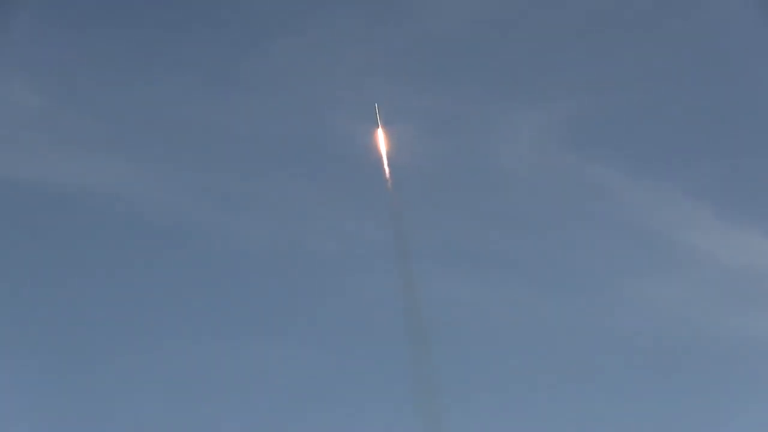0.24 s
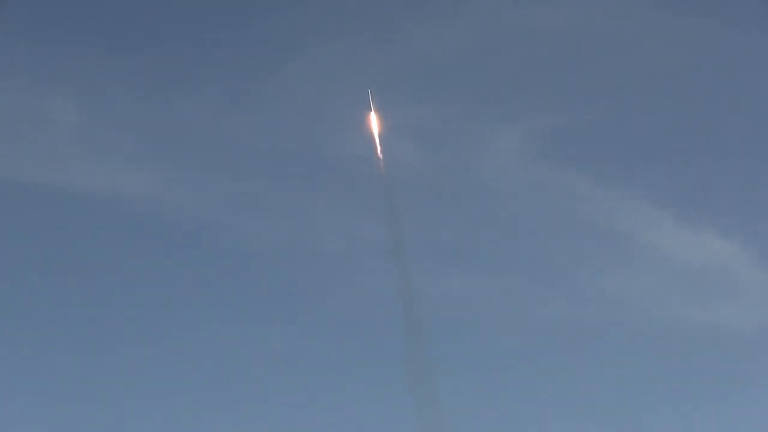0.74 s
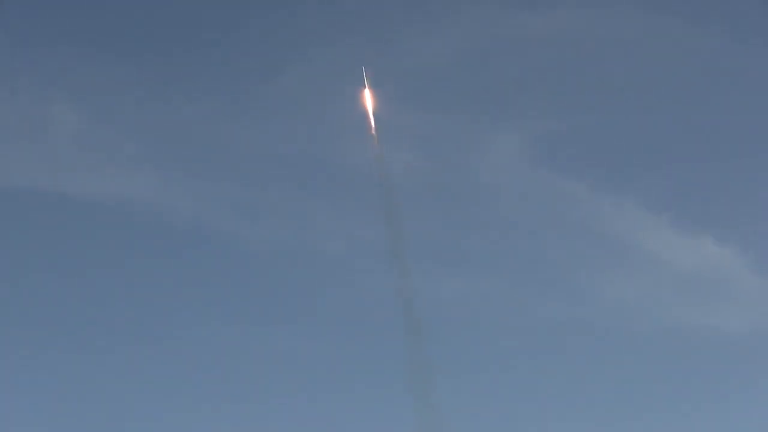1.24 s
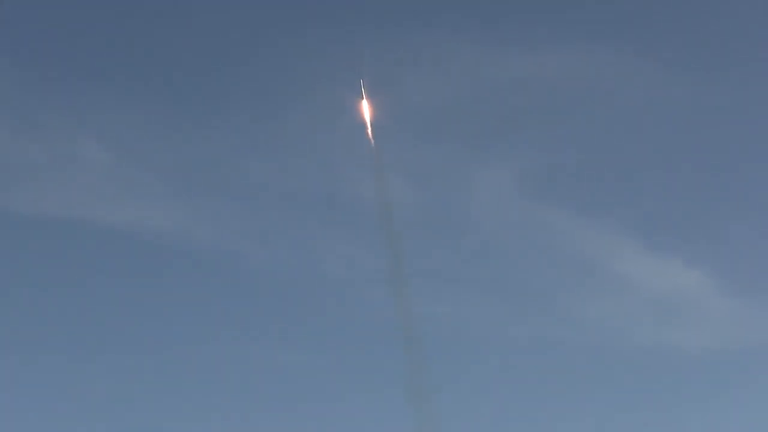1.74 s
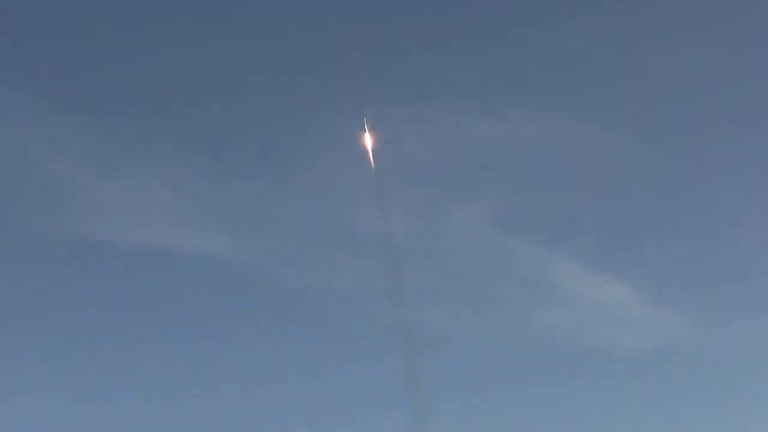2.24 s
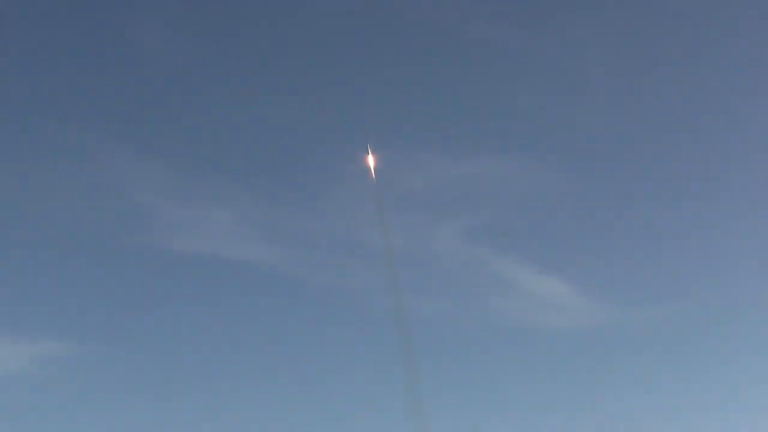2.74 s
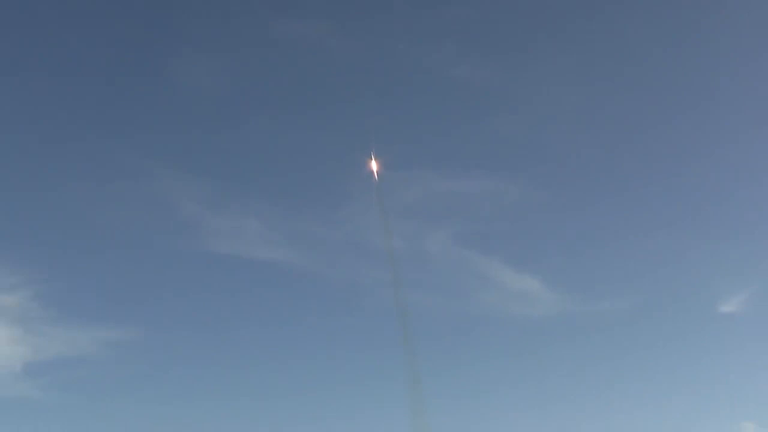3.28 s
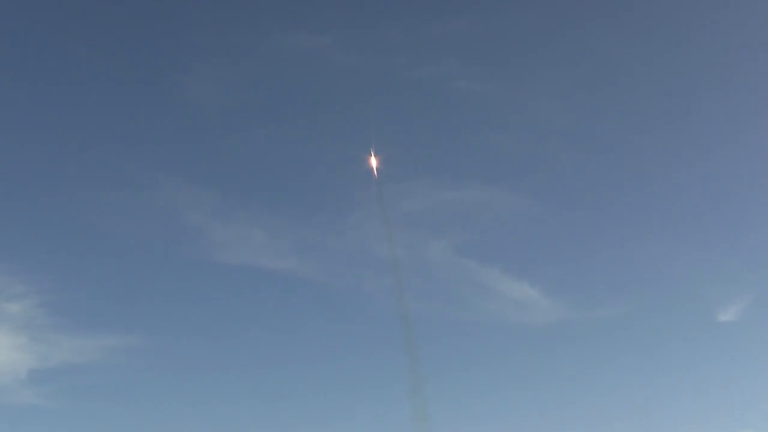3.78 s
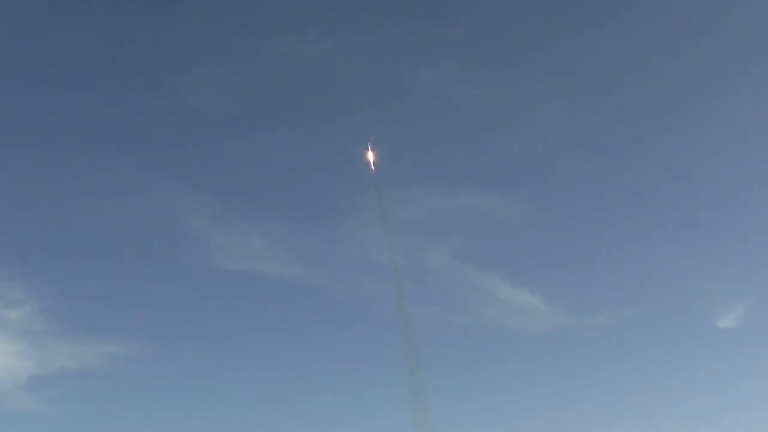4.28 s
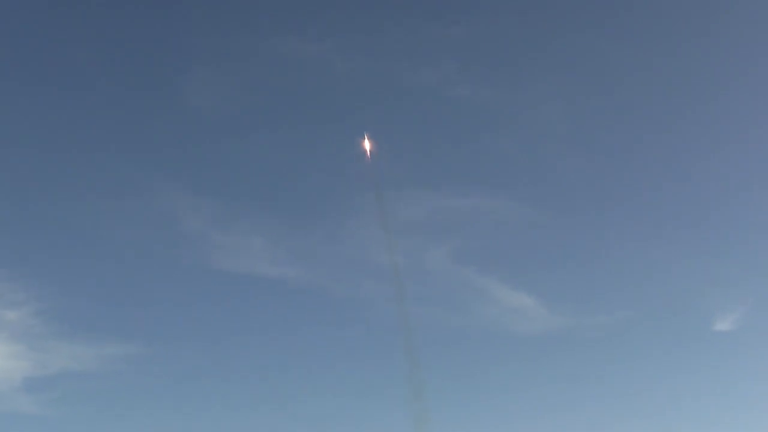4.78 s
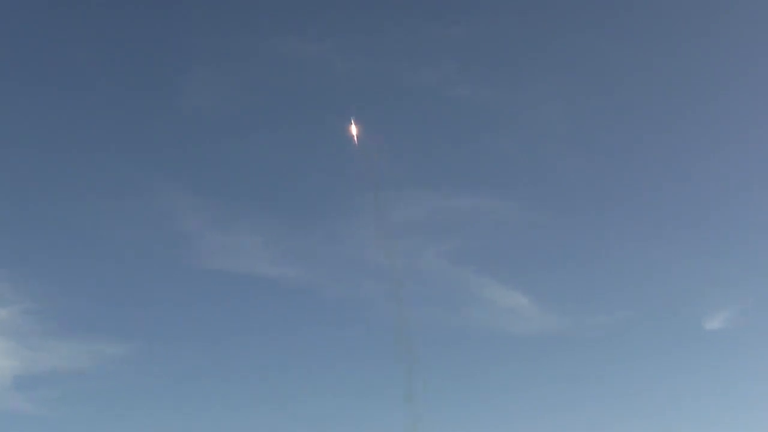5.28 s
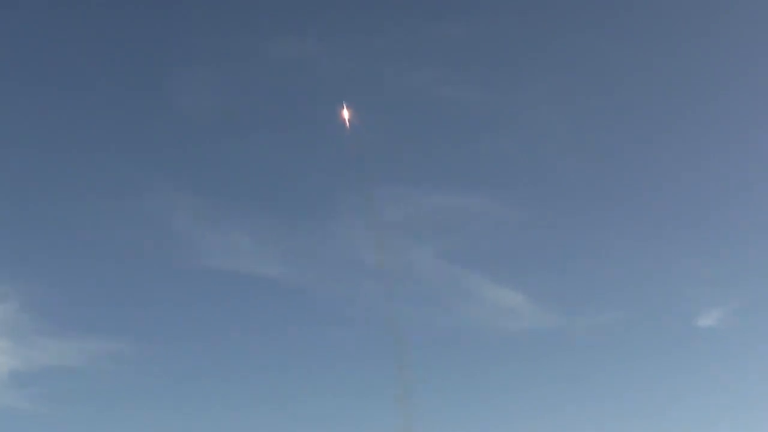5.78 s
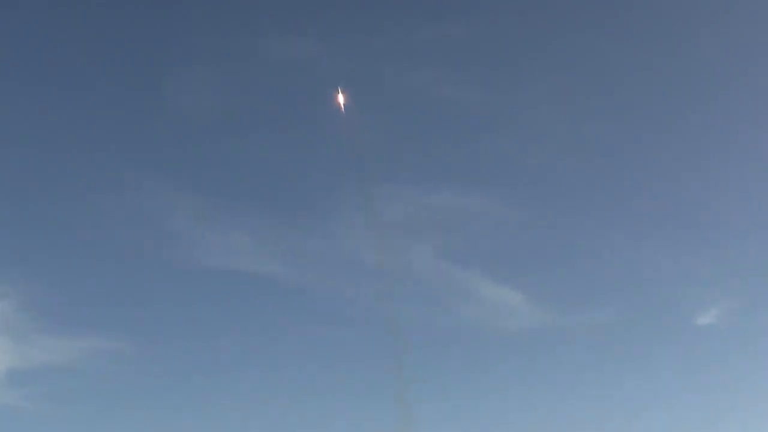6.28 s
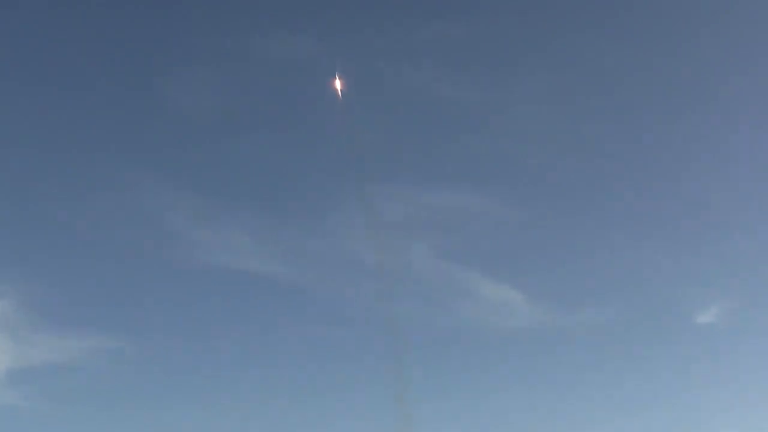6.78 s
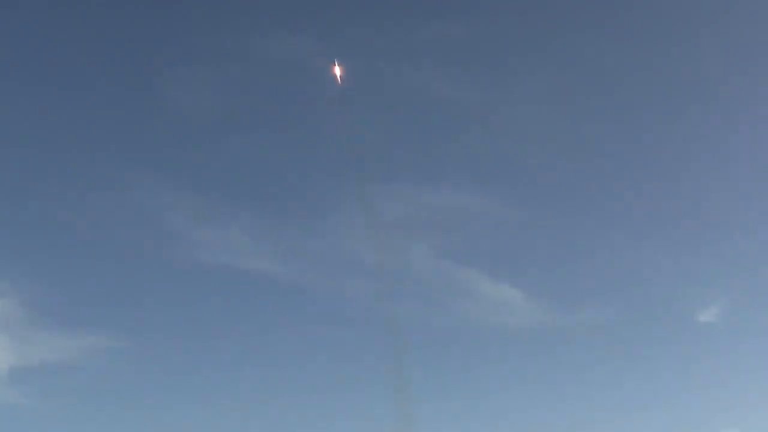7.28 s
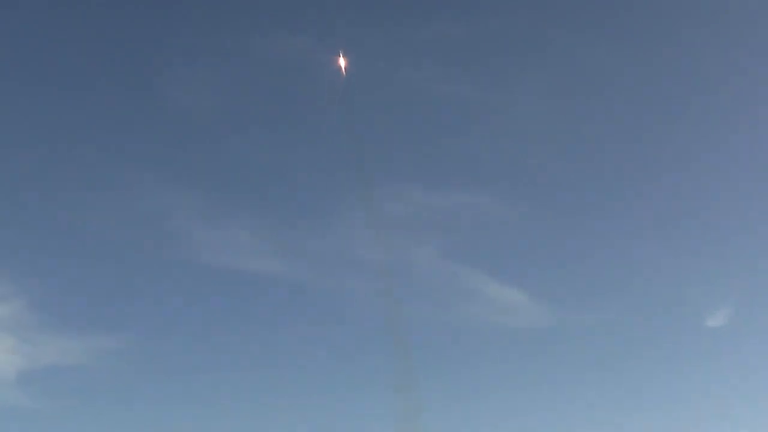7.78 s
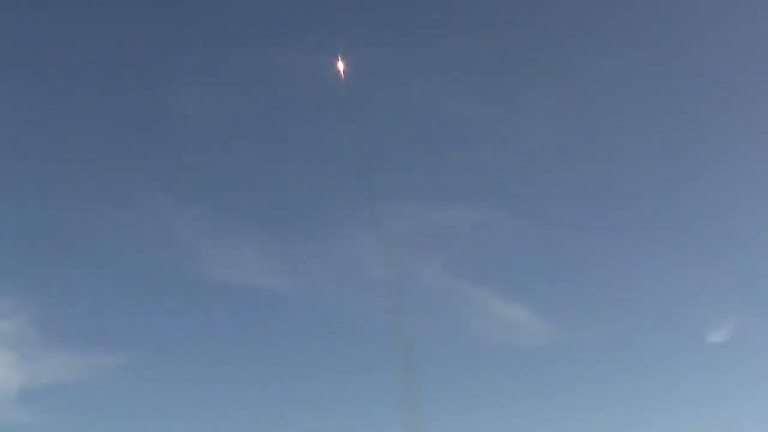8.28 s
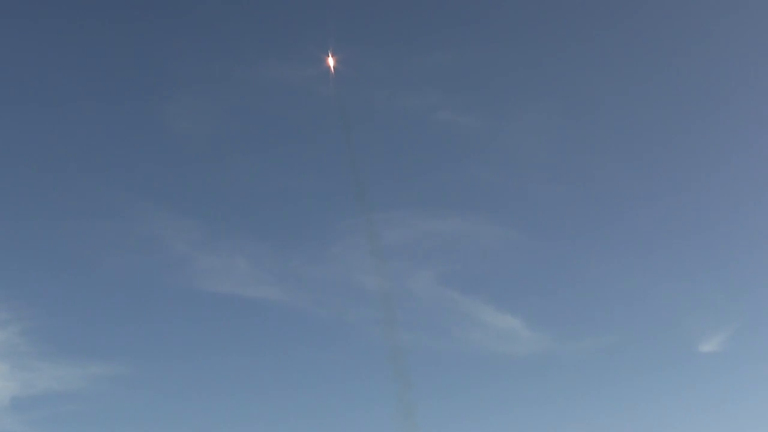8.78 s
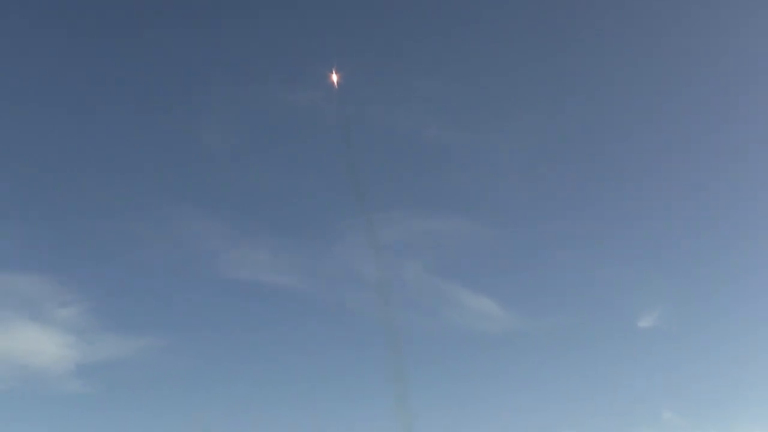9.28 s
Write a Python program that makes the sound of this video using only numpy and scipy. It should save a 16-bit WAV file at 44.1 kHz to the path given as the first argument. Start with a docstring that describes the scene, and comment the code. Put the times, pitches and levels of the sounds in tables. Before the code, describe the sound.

Sharp, irregular cracks and pops run over the low rumble of a distant ascending rocket, the roar easing as the crackle turns crisper.

```python
"""A deep roar, shot through with sharp crackle, comes from a rocket climbing far overhead.
Turbulent eddies in the exhaust rumble and rush; its steep shock fronts crackle and the tiniest sizzle,
rounded off more or less by the air from moment to moment. Each crack reaches the microphone directly,
then by reflection off nearby surfaces milliseconds later; the first bounce lags more as the rocket climbs."""
import sys
import numpy as np
from scipy.fft import rfft, irfft, next_fast_len
from scipy.io import wavfile
from scipy.ndimage import map_coordinates

SR = 44100
rng = np.random.default_rng(int(sys.argv[2]) if len(sys.argv) > 2 else 0)


def pcm_store(signal):
    """Save signal as 16-bit PCM."""
    levels = np.round(np.clip(np.atleast_2d(signal), -1, 1) * 32767)
    wavfile.write(sys.argv[1], SR, levels.astype(np.int16).T)


N = 420273
TIME = np.arange(N) / SR

# The strength of the exhaust noise. Each row: time in seconds, roar level in dB, sizzle level in dB.
EXHAUST = [(0, -23, -94), (.35, -21, -83), (.62, -19.5, -88), (.75, -23.5, -93.5), (.95, -18.5, -99),
           (1.27, -25.5, -84.5), (1.6, -19.5, -93), (2.1, -25.5, -82), (2.76, -30, -82.5),
           (3.3, -40.5, -82), (3.63, -31, -83), (3.9, -39.5, -74), (4.2, -34, -79), (4.75, -34.5, -70),
           (4.92, -32, -73), (5.3, -32.5, -74), (5.8, -30.5, -75.5), (6.1, -25.5, -82), (6.25, -28, -64),
           (6.34, -27.5, -75), (6.5, -26.5, -73), (6.95, -27, -64.5), (7.15, -37, -66), (7.4, -33, -65),
           (7.47, -30, -53.5), (7.6, -33, -57), (7.74, -27.5, -56), (7.79, -25.5, -71), (7.86, -27, -72),
           (7.93, -32, -55), (8.05, -30, -52.5), (8.19, -33, -49), (8.23, -34.5, -66), (8.28, -33.5, -53.5),
           (8.5, -37, -56.5), (8.66, -35, -72), (8.86, -34, -75.5), (9.2, -27, -76), (9.53, -27, -68)]
# The sound path during the climb. Each row: time in seconds, lag of the first bounce in ms, frequency of
# a front's swing in Hz, its quality factor, gain of the bounce in dB, extra direct-path rounding in ms.
PATH = [(0, 1.48, 335, 2.6, -14, .1), (1.7, 1.343, 352, 2, -17.5, 0.19),
        (2.8, 1.36, 327, 1.04, -14.5, 0.041), (3.8, 1.452, 336, 0.81, -22, 0.088),
        (4.7, 1.505, 343, 0.97, -23, 0.29), (5.7, 1.695, 305, 0.94, -21, 0.22),
        (6.8, 1.857, 268, 1.25, -16, 0.027), (7.7, 1.95, 302, 0.73, -25, 0.051),
        (8.4, 2.07, 374, 0.84, -20, 0.036), (9.53, 2.1, 364, 0.73, -30, 0.073)]


def amp(db):
    """Amplitude ratio of a level in decibels."""
    return 10 ** (np.asarray(db) / 20)


def unit(x):
    """Normalisation to an rms of 1."""
    return x / np.sqrt(np.mean(x ** 2) + 1e-20)


def columns(rows, seconds):
    """Linear interpolation of each column after the time."""
    times, *values = np.transpose(rows)
    return [np.interp(seconds, times, column) for column in values]


def wobble(rate):
    """Smooth random modulation: a spline through rate knots a second."""
    return map_coordinates(rng.standard_normal(int(N * rate / SR) + 4), [TIME * rate])


def filtered(x, response):
    """Linear filtering: the spectrum of x times a response of frequency."""
    padded = next_fast_len(N + 8192)
    return irfft(rfft(x, padded) * response(np.fft.rfftfreq(padded, 1 / SR)), padded)[..., :N]


def noise(spectrum, density=1):
    """Random excitation shaped by (Hz, dB) points, at rms 1; a low density leaves separate grains."""
    points_hz, db = np.transpose(spectrum)
    grains = rng.standard_normal(N) * (rng.random(N) < density)
    return unit(filtered(grains, lambda hz: amp(np.interp(np.log(hz + 1), np.log(points_hz + 1), db))))


def follow_roar(seconds, base_db, db_per_db, db_per_s):
    """Common source: a level in dB that follows the roar's excess over -27 dB and drifts with distance."""
    roar_db, _ = columns(EXHAUST, seconds)
    return base_db + db_per_db * (roar_db + 27) + db_per_s * seconds


def bounced(x, bounce_db):
    """Comb filtering: the direct sound interferes with its first reflection."""
    lag_ms = columns(PATH, TIME)[0]
    return x + amp(bounce_db) * np.interp(TIME - lag_ms / 1000, TIME, x)


def roar():
    """Turbulent mixing noise: the largest eddies radiate the lowest frequencies."""
    # Spectra of the roar and the rumble under it. Each row: frequency in Hz, relative density in dB.
    roar_spectrum = [(45, -32.5), (78, 2.5), (110, 0), (160, -3.5), (205, -10.5), (260, -10), (340, -37),
                     (570, -120)]
    rumble_spectrum = [(10, -33), (20, -1), (45, 6), (75, 2.5), (120, -35.5), (200, -120)]
    roar_db, _ = columns(EXHAUST, TIME)
    rumble_db = follow_roar(TIME, base_db=-33, db_per_db=0.6, db_per_s=0.6) + 0.62 * wobble(4.7)
    surging = unit(amp(1.2 * wobble(11)) * noise(roar_spectrum))
    return amp(roar_db) * surging + amp(rumble_db) * noise(rumble_spectrum)


def rush():
    """Smaller eddies radiate higher frequencies, in lumps over an even flow."""
    # The spectrum of the smaller eddies. Each row: frequency in Hz, relative density in dB.
    spectrum = [(88, -25.5), (150, 7), (210, -1.5), (270, 1), (330, 5.5), (450, -3), (680, -8.5),
                (953, -13), (1140, -19.5), (1340, -20), (2600, -35.5), (3370, -74.5), (4380, -76),
                (7410, -120)]
    lumps = amp(1.5 * wobble(8.3) + 1.8 * wobble(60)) * noise(spectrum, density=0.008)
    even = amp(-3.5 + 1.2 * wobble(20)) * noise(spectrum)
    level_db = follow_roar(TIME, base_db=-30.5, db_per_db=0.44, db_per_s=-0.15)
    return amp(level_db) * unit(bounced(lumps + even, bounce_db=-10))


def sizzle():
    """Shot noise: the tiniest shock fronts arrive at random and merge into spurts of treble."""
    # The spectrum of the tiniest fronts. Each row: frequency in Hz, relative density in dB.
    spectrum = [(1000, -120), (1500, 5), (2600, 8.5), (4000, 1.5), (5500, -2), (7500, -10.5), (9500, -16.5),
                (13000, -45), (16000, -120)]
    _, level_db = columns(EXHAUST, TIME)
    spurts = amp(3.5 * wobble(14) + 4 * wobble(90))
    return amp(level_db) * unit(bounced(spurts * noise(spectrum, density=0.016), bounce_db=-5.5))


def air_rounding(hz, rise_ms):
    """Air absorption: a Gaussian low-pass that spreads a sudden step over its rise time."""
    width = np.pi ** 2 * hz * np.clip(rise_ms, 0.01, 2) / 2000 + 1e-9
    return np.exp(-width ** 2 / 8)


def resonance(hz, centre_hz, q):
    """Frequency response of a damped oscillator."""
    return 1 / (centre_hz ** 2 - hz ** 2 + 1j * hz * centre_hz / q)


def shock_fronts(seconds, jump_db, rise_ms):
    """Multipath propagation: each pressure jump swings back below zero and is followed by its echoes."""
    span, lead = 2048, 128  # samples for each front, and of those ahead of its jump
    hz, t = np.fft.rfftfreq(span, 1 / SR), np.arange(span) / SR
    count = len(seconds)
    jump_db, rise_ms = jump_db[:, None], rise_ms[:, None]
    lag_ms, swing_hz, q, bounce_db, rounding_ms = columns(PATH, seconds[:, None])
    delay = lambda ms: np.exp(-2j * np.pi * hz * ms / 1000)
    lowpass = lambda corner_hz: 1 / (1 + 1j * hz / corner_hz)
    spread = lambda db: db * rng.standard_normal((count, 1))
    scatter = lambda envelope: rfft(rng.standard_normal((count, span)) * envelope)

    swing = 1j * hz * resonance(hz, swing_hz, q)
    tooth = amp(-18 + 3.2 * (jump_db + 8.5)) * air_rounding(hz, 0.68 * rise_ms)
    edge = air_rounding(hz, rise_ms) + tooth  # strong fronts keep a steep tooth
    direct = edge * swing * air_rounding(hz, rounding_ms)
    direct_peak = irfft(direct).max(1, keepdims=True)
    suction = -amp(-16.5) * 102 * resonance(hz, centre_hz=95.5, q=1.2)

    tick = amp(11) / (1200 + 1j * hz)  # brightens the first bounce
    first = amp(bounce_db + spread(db=1)) * delay(lag_ms) * (swing + tick) * lowpass(12000)
    # As the first lag grows, the second bounce weakens, and both it and a soft thump come later.
    extra_ms = lag_ms - 1.23
    second = amp(-2.5 - 5 * extra_ms) * delay(2.56 + 0.53 * extra_ms) * swing * lowpass(190)
    thump_shape = 130 * resonance(hz, centre_hz=129, q=0.98) * lowpass(550)
    thump = amp(-8.5) * delay(3.61 + 2.6 * extra_ms) * thump_shape
    far_echo = amp(-23.5 + spread(db=3)) * delay(8.5) * swing * (1 - lowpass(1500))

    # Ground and bushes scatter a short burst and a faint wash behind each front.
    burst = scatter(amp(-27 - 60 * t / 0.014)) * lowpass(11000)
    wash = scatter(amp(-31 - 60 * t / 0.035) + amp(-43 - 60 * t / 0.08)) * lowpass(4100) ** 2
    scattered = (burst + wash) * delay(0.613) * swing * (1 - lowpass(1400))

    arrivals = direct + edge * (suction + first + second + thump + far_echo + scattered)
    start = seconds[:, None] * SR
    fine_timing = delay(1000 * (lead + start % 1) / SR)
    waves = irfft(arrivals * fine_timing) * amp(jump_db) / direct_peak
    index = start.astype(int) + np.arange(span)
    return np.bincount(index.ravel(), waves.ravel(), N + 2 * span)[lead:lead + N]


def crackle(small_count=2400):
    """Nonlinear steepening: distinct shocks crack over a crowd of small ones, steeper when stronger."""
    # The distinct shock fronts. Each row: arrival in seconds, pressure jump in dB, rise time in ms.
    distinct_fronts = [(0.1889, -11.5, 0.18), (0.262, -12.5, 0.28), (.315, -14, 0.31), (0.3252, -18.5, 1),
                       (0.3532, -13, 0.37), (0.5532, -12.5, 0.22), (.659, -14, 0.26), (.842, -12, 0.31),
                       (1.094, -18.5, 0.21), (1.2903, -5.5, 0.16), (1.3182, -13, 0.4), (1.469, -8.5, 0.19),
                       (1.55, -11.5, 0.27), (1.573, -9, 0.45), (1.6664, -16, 0.3), (1.6728, -10.5, 0.34),
                       (1.7034, -9, 0.31), (1.7077, -11.5, 0.2), (1.9116, -9.5, 0.51), (1.9725, -7.5, 0.16),
                       (2.0034, -7, 0.15), (2.0721, -8.5, 0.14), (2.1263, -14.5, 0.33),
                       (2.1397, -13.5, 0.32), (2.2118, -14, 0.27), (2.2344, -9.5, .17), (2.254, -13, 0.23),
                       (2.299, -10, 0.25), (2.3652, -13.5, 0.47), (2.383, -15, 0.31), (2.413, -7.5, 0.21),
                       (2.4242, -10, .25), (2.4334, -13, .27), (2.446, -10, 0.26), (2.465, -10, 0.25),
                       (2.4964, -12.5, 0.25), (2.5115, -9, .19), (2.575, -11.5, 0.23), (2.6689, -9.5, 0.29),
                       (2.6835, -11, 0.21), (2.7035, -13.5, 0.27), (2.7255, -15, 0.27), (2.749, -16, 0.28),
                       (2.789, -10.5, .18), (2.8036, -14, 0.23), (2.8104, -12.5, 0.2), (2.841, -9, 0.19),
                       (2.8522, -9, 0.19), (2.8842, -16.5, 0.39), (2.914, -22, 0.22), (2.9419, -10.5, 0.21),
                       (2.9636, -9, 0.17), (2.9984, -15, 0.19), (3.0039, -11, 0.21), (3.0147, -11.5, 0.18),
                       (3.0408, -15, 0.22), (3.0632, -15, 0.2), (3.073, -15.5, 0.21), (3.0985, -7.5, 0.14),
                       (3.1383, -15, .19), (3.1685, -15.5, 0.22), (3.1856, -14.5, 0.2), (3.201, -10.5, .15),
                       (3.2246, -9.5, 0.13), (3.254, -8, 0.084), (3.2741, -17, 0.17), (3.3096, -12.5, 0.16),
                       (3.338, -9.5, 0.12), (3.3525, -14.5, 0.17), (3.368, -14, .18), (3.3938, -15, 0.18),
                       (3.3986, -13.5, 0.19), (3.42, -10, 0.16), (3.4606, -9.5, .12), (3.492, -12.5, 0.21),
                       (3.5193, -8.5, .12), (3.537, -16, 0.32), (3.5474, -16, 0.3), (3.5671, -11, 0.17),
                       (3.585, -13.5, 0.21), (3.659, -13.5, 0.42), (3.6687, -10, 0.21), (3.6975, -9, 0.17),
                       (3.718, -11.5, .28), (3.7394, -17, 0.13), (3.7672, -17, 0.1), (3.7728, -12, 0.21),
                       (3.776, -12, 0.26), (3.799, -17, 0.24), (3.813, -8.5, 0.16), (3.8511, -7.5, 0.17),
                       (3.858, -7.5, 0.054), (3.8689, -14, 0.097), (3.8909, -10.5, 0.096),
                       (3.9381, -8, 0.073), (3.91, -18, .28), (3.981, -10.5, 0.16), (3.988, -15, 0.26),
                       (4.0087, -7, 0.11), (4.046, -14.5, 0.3), (4.0866, -9.5, 0.12), (4.1223, -9.5, 0.13),
                       (4.1488, -8.5, 0.064), (4.175, -13.5, 0.42), (4.242, -7.5, 0.1), (4.2835, -12, 0.18),
                       (4.2956, -13, 0.23), (4.3066, -12, 0.2), (4.332, -8, 0.24), (4.388, -7.5, 0.089),
                       (4.4036, -14, 0.21), (4.443, -14.5, 0.31), (4.462, -7.5, 0.14), (4.51, -14, 0.27),
                       (4.5265, -11.5, 0.21), (4.5403, -9.5, 0.38), (4.575, -8, 0.13),
                       (4.6065, -13.5, 0.24), (4.6469, -9.5, 0.16), (4.669, -13, 0.56),
                       (4.7075, -9.5, 0.11), (4.734, -10.5, 0.11), (4.766, -11, 0.2), (4.793, -20.5, 0.048),
                       (4.81, -8, 0.12), (4.839, -12, 0.17), (4.894, -19, 0.15), (4.952, -16, 0.4),
                       (4.977, -16, 0.37), (5.0032, -11, 0.11), (5.0187, -11, 0.19), (5.0641, -9, 0.19),
                       (5.0874, -15.5, 0.075), (5.1081, -10.5, 0.27), (5.151, -11, 0.13),
                       (5.2075, -7, 0.098), (5.2117, -17.5, 0.5), (5.2393, -16.5, 0.21),
                       (5.2993, -7.5, 0.1), (5.393, -14.5, 0.1), (5.426, -8.5, 0.12), (5.4477, -9, 0.12),
                       (5.4965, -11, 0.13), (5.5567, -14.5, 0.13), (5.5811, -14, 0.15),
                       (5.5914, -17.5, 0.25), (5.62, -12, 0.39), (5.639, -8.5, 0.11), (5.6674, -11, 0.17),
                       (5.7621, -12, 0.11), (5.7938, -10, 0.19), (5.8095, -11.5, 0.19), (5.8283, -16, 0.2),
                       (5.871, -11.5, 0.14), (5.931, -9.5, 0.14), (5.969, -16.5, 0.042),
                       (6.0189, -14.5, 0.27), (6.038, -14.5, 0.89), (6.0501, -11.5, .27), (6.063, -14, 0.2),
                       (6.0739, -10.5, 0.21), (6.1255, -14.5, 0.4), (6.152, -17.5, 0.029),
                       (6.1733, -7, 0.072), (6.2367, -7, 0.08), (6.2842, -9, 0.068), (6.375, -13.5, 0.34),
                       (6.4199, -13, 0.24), (6.4265, -14.5, 0.22), (6.458, -11, 0.15), (6.471, -14, 0.16),
                       (6.5466, -10, 0.15), (6.564, -11.5, 0.12), (6.5829, -10.5, 0.096),
                       (6.6462, -17, 0.22), (6.6844, -7.5, 0.08), (6.697, -14, 0.14), (6.7112, -8, 0.09),
                       (6.7587, -10, 0.081), (6.7885, -12.5, 0.21), (6.8372, -14.5, 0.15),
                       (6.8748, -10, 0.082), (6.8887, -20, .18), (6.903, -11.5, 0.076),
                       (6.9243, -9.5, 0.072), (6.9692, -16.5, .19), (6.9955, -11, 0.1), (7.0334, -9, 0.063),
                       (7.0515, -14, 0.08), (7.1071, -9.5, 0.054), (7.142, -13, 0.064),
                       (7.1599, -8.5, .049), (7.2005, -8.5, 0.058), (7.2441, -16.5, 0.086),
                       (7.273, -9.5, 0.061), (7.3085, -13.5, .09), (7.3418, -10, 0.054),
                       (7.4237, -9, 0.091), (7.447, -9.5, 0.055), (7.5221, -17.5, 0.14),
                       (7.5484, -8, 0.077), (7.5535, -8, 0.073), (7.5984, -13, 0.099), (7.616, -10.5, 0.1),
                       (7.6418, -13.5, .15), (7.6566, -12, 0.18), (7.683, -14.5, 0.084),
                       (7.7094, -9.5, 0.089), (7.735, -11, 0.16), (7.7728, -16, 0.19), (7.78, -12.5, 0.32),
                       (7.8813, -13.5, 0.16), (7.888, -10, 0.15), (7.9129, -4.5, 0.035), (7.9184, -15, .15),
                       (7.9629, -9, 0.16), (7.9826, -9.5, 0.043), (8.032, -7.5, 0.036), (8.0376, -15, 0.15),
                       (8.053, -17, 0.069), (8.0706, -15.5, 0.06), (8.0902, -10, 0.15),
                       (8.1384, -10.5, 0.25), (8.1467, -15, 0.34), (8.1886, -13, 0.053), (8.2015, -8, 0.05),
                       (8.2507, -16, 0.13), (8.266, -10, 0.087), (8.3139, -8, 0.066), (8.332, -9.5, 0.056),
                       (8.3698, -15.5, 0.29), (8.382, -16.5, 0.43), (8.4055, -13.5, 0.11),
                       (8.4407, -15, 0.63), (8.461, -12.5, 0.05), (8.466, -11.5, 0.45), (8.4773, -15, 0.16),
                       (8.5459, -15.5, 0.072), (8.6284, -12.5, 0.089), (8.7081, -15, 0.21),
                       (8.7718, -16, 0.21), (8.8915, -9.5, 0.15), (8.924, -22, 0.06), (8.9876, -19.5, 0.1),
                       (9.125, -16.5, 0.21), (9.187, -16.5, 0.2), (9.222, -16, 0.23), (9.3092, -18, 0.11),
                       (9.3273, -19, 0.16), (9.34, -19, 0.12), (9.4226, -20.5, 0.18), (9.4856, -16.5, 0.22),
                       (9.514, -15, 0.24), (0.057, -17, 0.3), (0.219, -16, 0.37), (0.225, -25, 0.39),
                       (0.3014, -13, 0.37), (0.3251, -15.5, 0.46), (0.3483, -20.5, 0.48),
                       (0.3651, -25, 0.42), (0.4866, -17, 0.55), (0.5791, -15, 0.34), (0.6127, -17, 0.38),
                       (0.8675, -16, 0.47), (0.874, -23, 0.45), (0.879, -15, 0.51), (1.0461, -15, 0.48),
                       (1.1319, -18.5, 0.5), (1.1661, -22, 0.42), (1.18, -22.5, 0.51), (1.187, -18, 0.54),
                       (1.2177, -19.5, 0.54), (1.2569, -11.5, 0.56), (1.2834, -19, 0.47),
                       (1.3112, -33, 0.31), (1.348, -27, 0.37), (1.495, -20.5, 0.22), (1.5394, -20.5, 0.32),
                       (1.6107, -15, 0.46), (1.6384, -19, 0.36), (1.657, -11, 0.47), (1.7401, -22, 0.37),
                       (1.7857, -13, 0.53), (2.0315, -16.5, 0.33), (2.0997, -16, 0.31), (2.1618, -17, 0.36),
                       (2.261, -25, 0.23), (2.3368, -19.5, 0.2), (2.3443, -16.5, 0.51), (2.4, -14, 0.27),
                       (2.4777, -24, 0.35), (2.5339, -19.5, 0.31), (2.769, -22, 0.27), (2.8721, -27, 0.45),
                       (2.8783, -23, 0.42), (2.9233, -18, 0.32), (2.9817, -19, 0.27), (3.1279, -22, 0.33),
                       (3.143, -19, 0.23), (3.1571, -21, 0.24), (3.2337, -18, 0.24), (3.2943, -20, 0.18),
                       (3.3251, -15, 0.21), (3.3784, -25, 0.22), (3.4307, -21, 0.23), (3.4484, -16, 0.42),
                       (3.4726, -20, 0.27), (3.5758, -23, 0.22), (3.7292, -14, 0.35), (3.823, -22, 0.28),
                       (3.9672, -24, 0.22), (4.0365, -20, 0.34), (4.055, -20, 0.52), (4.112, -26, 0.35),
                       (4.1861, -18, 0.27), (4.258, -19, 0.27), (4.595, -19, 0.35), (4.6256, -16, 0.35),
                       (5.0446, -20, 0.11), (5.052, -26, 0.21), (5.096, -25, 0.13), (5.4604, -24, 0.23),
                       (5.468, -19, 0.24), (5.5262, -15, 0.34), (5.6018, -15, 0.26), (5.7047, -15, 0.25),
                       (5.8583, -17.5, 0.2), (6.1105, -23, 0.28), (6.2638, -18, 0.16), (6.2699, -17, 0.24),
                       (6.3203, -23, 0.21), (6.3879, -12, 0.35), (6.4113, -18, 0.28), (6.5257, -17.5, 0.24),
                       (6.593, -19, 0.45), (6.6205, -19, 0.19), (6.629, -18, 0.19), (6.6692, -13.5, 0.27),
                       (7.255, -22, 0.087), (7.2814, -23, 0.16), (7.3208, -21, 0.19), (7.3545, -21, 0.13),
                       (7.3787, -20, 0.15), (7.475, -25, 0.19), (7.5787, -17, 0.27), (7.6925, -25, 0.21),
                       (7.7668, -21, 0.066), (7.794, -16.5, 0.24), (7.829, -14.5, 0.54),
                       (8.3429, -19, 0.06), (8.5213, -24, 0.1), (8.5555, -13, 0.35), (8.6407, -22, 0.34),
                       (8.6457, -23, 0.39), (8.872, -19, 0.42), (8.8765, -20, 0.31), (8.9696, -29, 0.28),
                       (9.0274, -30, 0.27), (9.1507, -21.5, 0.22), (9.1723, -24, 0.21), (9.228, -23, 0.24),
                       (9.2386, -22.5, 0.26), (9.2977, -18, 0.22), (9.316, -24, 0.17),
                       (9.4722, -18.5, 0.27)]
    when, weakness, roundness = rng.random((small_count, 3)).T
    seconds = when * N / SR
    bunching_db = 2.5 * wobble(12)[(when * N).astype(int)]
    excess_db = bunching_db - 2.5 * (1 + np.log(np.clip(weakness, 0.12, 1)))
    jump_db = follow_roar(seconds, base_db=-27, db_per_db=0.089, db_per_s=-0.4) + excess_db
    # Clear air lets the sizzle through and keeps the small fronts steep.
    _, sizzle_db = columns(EXHAUST, seconds)
    rise_ms = 0.21 * amp(1.5 * roundness - 0.39 * (sizzle_db + 70) - 0.072 * excess_db)
    return shock_fronts(*np.transpose(distinct_fronts)) + shock_fronts(seconds, jump_db, rise_ms)


def scene():
    """Superposition: the sounds of the exhaust add in one channel."""
    return (roar() + rush() + sizzle() + crackle())[None]


def record(dry):
    """Transduction: the microphone blocks steady pressure, rounds peaks, adds hiss and limits the band."""
    low_hz, top_hz, ceiling = 15, 15870, 0.37
    passed = filtered(dry, lambda hz: 1j * hz / (low_hz + 1j * hz))
    saturated = passed / (1 + np.abs(passed / ceiling) ** 4) ** (1 / 4)
    hiss = amp(-102) * rng.standard_normal(dry.shape)
    return filtered(saturated + hiss, lambda hz: hz < top_hz)


dry = scene()
out = record(dry)
pcm_store(out)
```